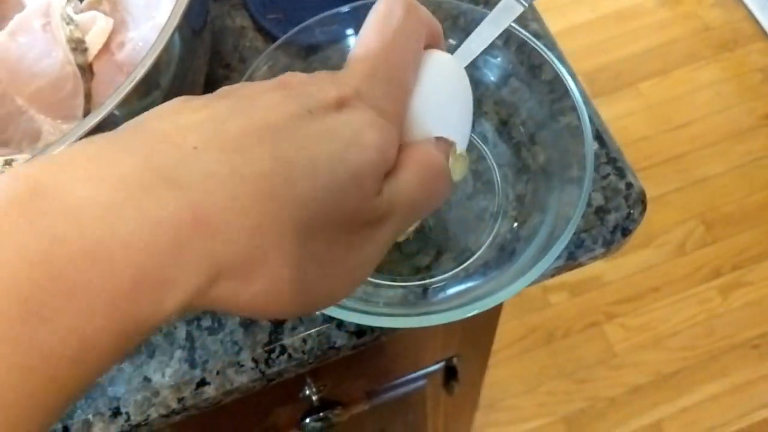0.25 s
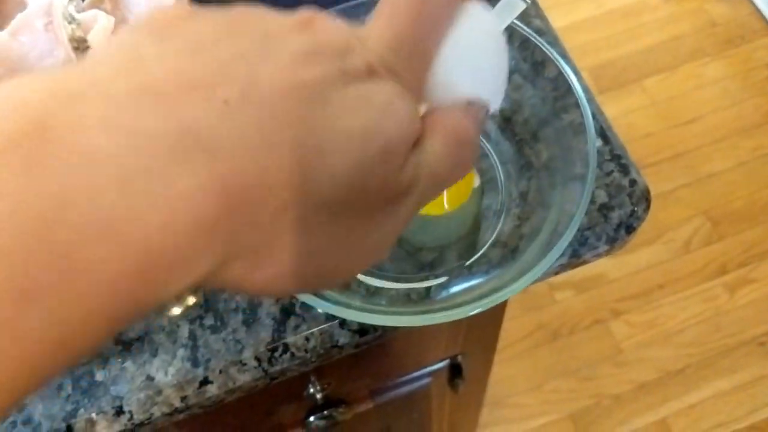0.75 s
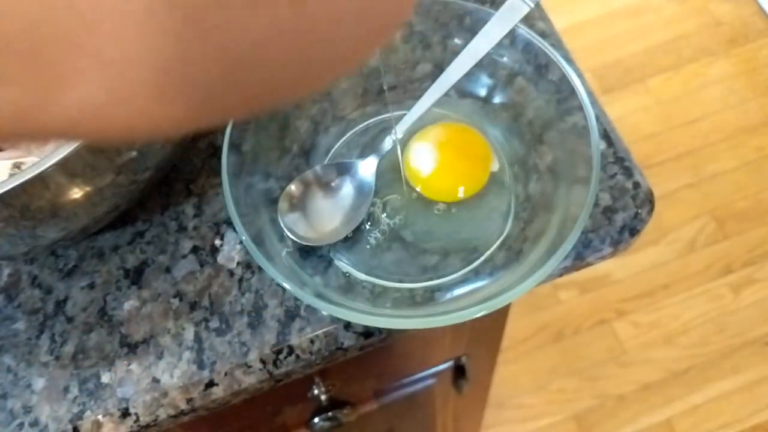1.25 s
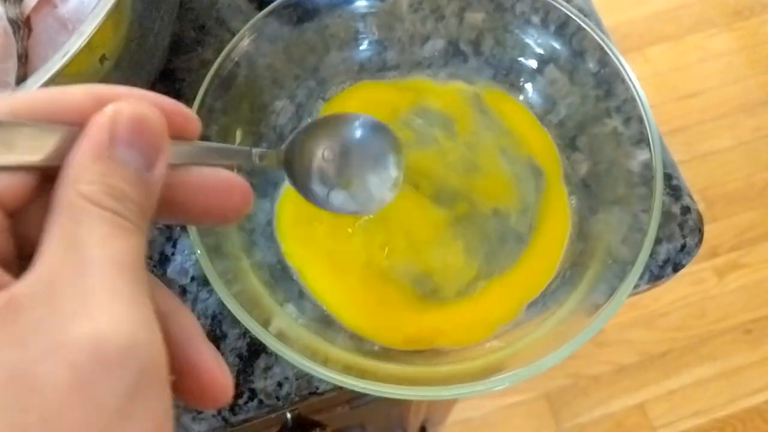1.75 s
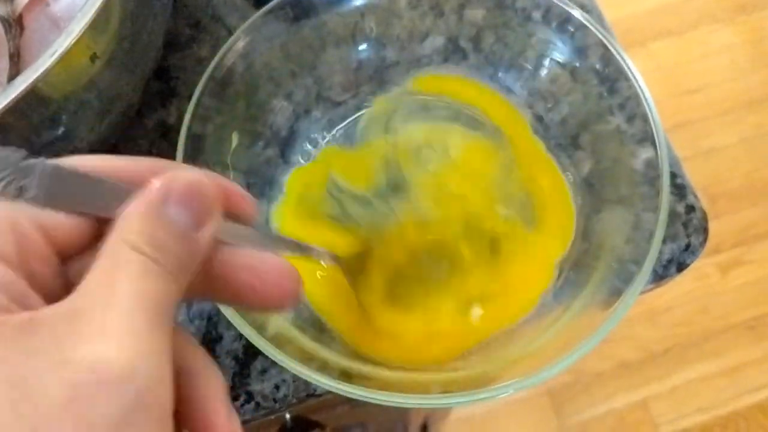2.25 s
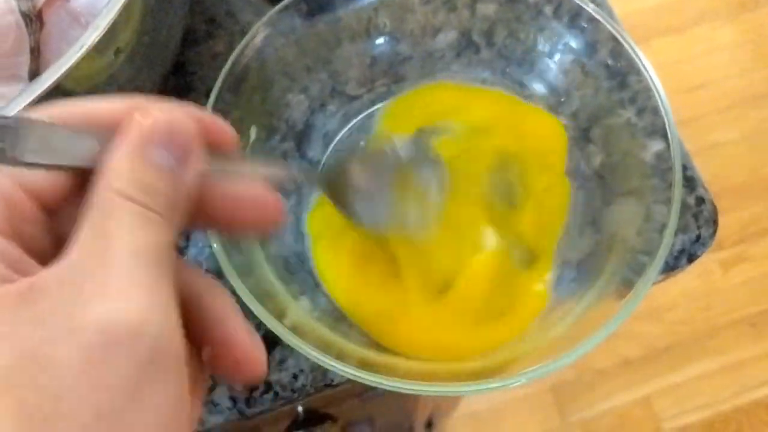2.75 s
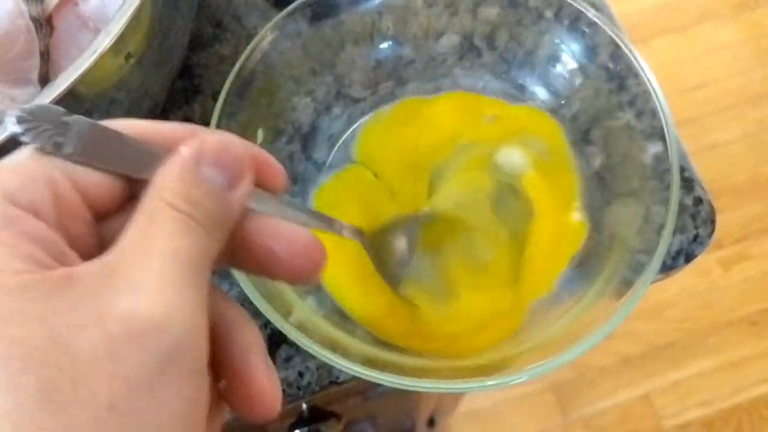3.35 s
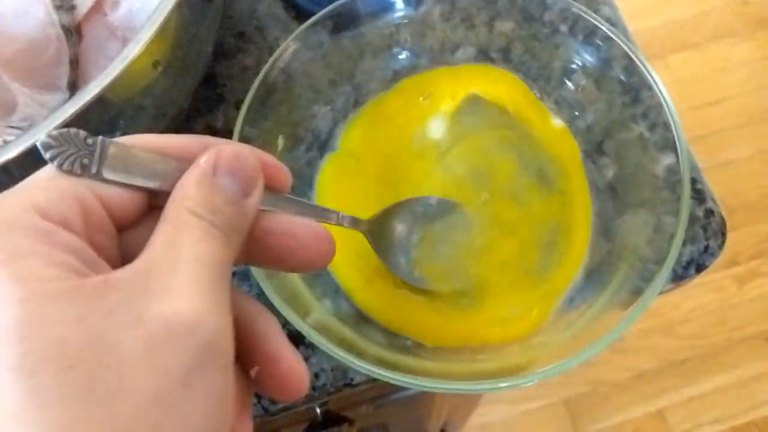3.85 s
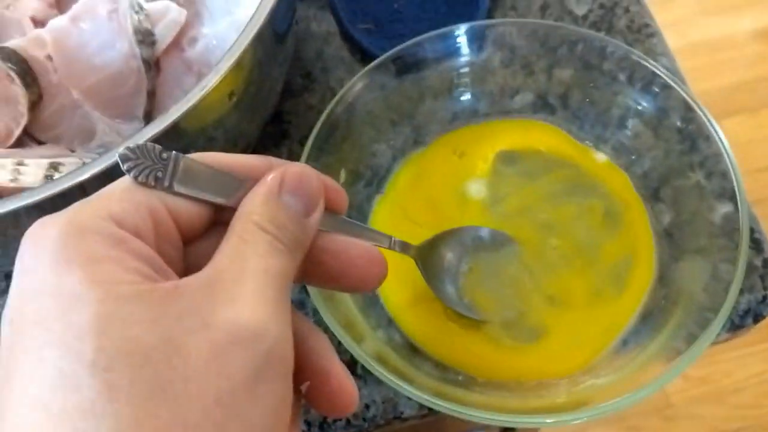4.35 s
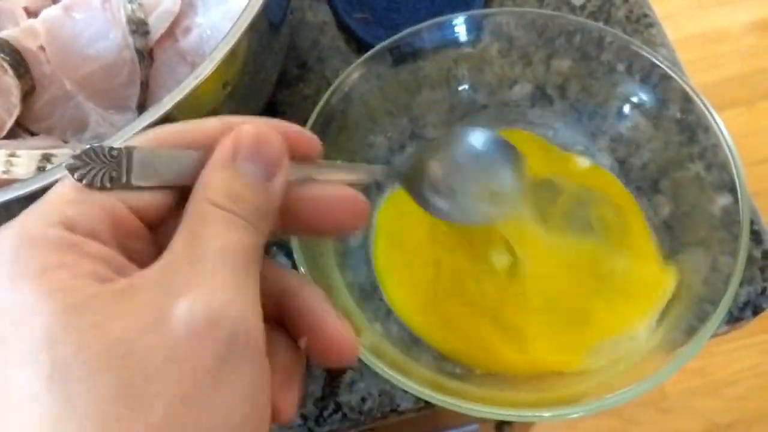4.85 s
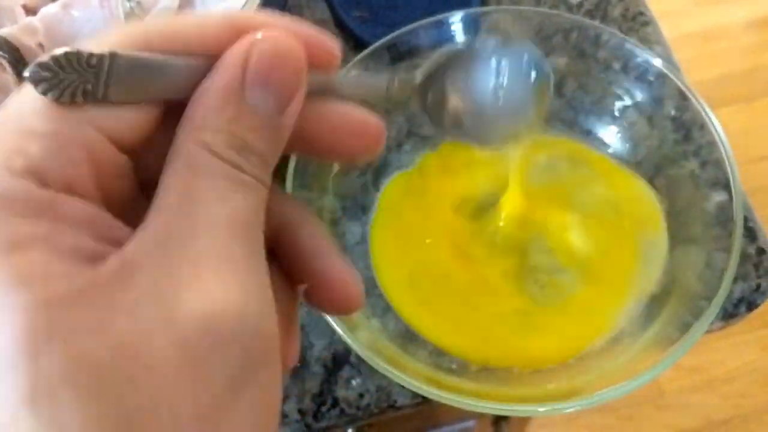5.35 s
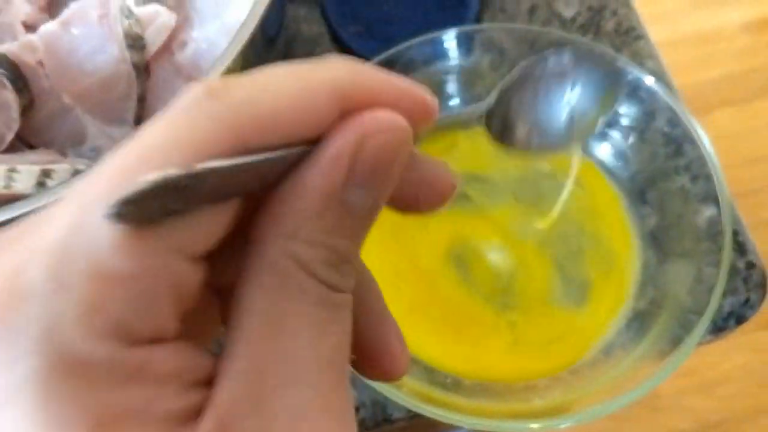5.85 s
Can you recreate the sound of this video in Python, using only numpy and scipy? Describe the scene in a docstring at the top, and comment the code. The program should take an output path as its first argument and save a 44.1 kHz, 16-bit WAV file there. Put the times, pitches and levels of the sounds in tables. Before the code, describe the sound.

A close microphone in a small kitchen, with a quiet, slightly wavering low appliance hum, fan rumble and faint hiss throughout. At the very start come tiny brittle ticks, then from 0.14 to 0.22 seconds a dense cluster of sharp eggshell snaps over fine crumbling. Around 0.56 to 0.64 a weaker, more hollow crackle follows as the shell is pulled apart, with barely audible ticks until about 1.25. A very faint spoon touch at 1.56 leads into light clinks from 1.74, then brighter, stronger steel-on-glass strokes from 2.3 to 3.35, roughly five a second, loudest near 3.1. Each is short and egg-damped, with an edgy click, a dull knock and a short room tail. A sharp tiny tick falls at 3.53 and a softer one at 3.7; low wet pops come near 4.3. Three spaced clinks at 4.74, 5.02 and 5.24, the last softer, leave only the hum until about 6.

```python
"""In a small kitchen an eggshell is cracked and pulled apart over a glass bowl, as brittle snaps over crumbling noise.
A steel spoon then beats the egg about five times a second, with a pause before the last three strokes:
damped bowl and spoon modes, a noisy edge crack, a dull knock and a counter boom.
A few taps and wet pops are damped tones. The room answers shell, spoon and pops with short diffuse tails,
and an appliance motor hums underneath on wavering sine lines over fan rumble and hiss."""
import sys
import numpy as np
from scipy import signal
from scipy.fft import rfft, irfft, next_fast_len
from scipy.io import wavfile
from scipy.ndimage import map_coordinates

SR = 44100
rng = np.random.default_rng(int(sys.argv[2]) if len(sys.argv) > 2 else 0)


def bounce(signal):
    """Save signal as a 16-bit WAV file at the path given by the first command-line argument."""
    frames = np.transpose(np.atleast_2d(signal))
    limited = np.clip(frames, -1, 1)
    pcm = np.round(limited * 32767).astype(np.int16)
    wavfile.write(sys.argv[1], SR, pcm)


N = 268569  # length [samples]

# Spoon strokes on the bowl: t/s, stroke level/dB; then, relative to that stroke: upper rim level/dB,
# spoon level/dB, highest modes level/dB, edge crack level/dB; then first rim f/Hz, second rim f/Hz, spoon f/Hz
SPOON_STROKES = [(1.56, -42, 2, 4, -5, 9, 1303, 4020, 4750),
                 (1.7418, -32.5, 8, 10, -2.5, 8, 1640, 3910, 4620),
                 (1.9027, -31, 11, 9, 3, -3, 1660, 3762, 4800),
                 (1.959, -29.5, -0.5, 1.5, -20, -9, 1260, 3654, 4500),
                 (2.3339, -25, 0, -7, 3, 1.5, 1510, 3840, 5260),
                 (2.537, -27.5, -5, -8.5, 3.5, 0.5, 1573, 3980, 4940),
                 (2.6039, -30.5, -7, -8, -15, -0.5, 1375, 3890, 5000),
                 (2.7382, -26, -4, 6.5, -2, -3, 1537, 3960, 4706),
                 (2.9361, -24, -3, 7, -4, 1.5, 1720, 3994, 4760),
                 (3.1308, -21, -4.5, 2, 0, 1, 1590, 3950, 4690),
                 (3.3392, -24, -5, -13, 3, 1.5, 1550, 3900, 4760),
                 (4.7355, -29.5, -3, -8.5, -4, 1, 1588, 3970, 4690),
                 (5.0243, -27, 4.5, -0.5, 4, 0, 1597, 3856, 4600),
                 (5.2375, -34.5, 6, -5.5, 0, -1.5, 1620, 3820, 4550)]
# Balance of the six mode families in an even stroke, low to high: level/dB
FAMILY_BALANCE = [-0.5, -11, -0.03, -3.5, -2.5, .5]
# Steel edge on glass, noise colour: f/Hz, level/dB
CRACK_COLOUR = [(200, -4), (800, -22), (1300, -17), (2200, 5.5), (4500, 1.5), (9000, -4), (10500, -9),
                (13000, -15), (16000, -28.5)]
# The bowl's base on the counter, noise colour: f/Hz, level/dB
KNOCK_COLOUR = [(100, -13), (200, 8.5), (330, -7), (500, -1.5), (750, -2), (1000, 5), (1300, -1.5),
                (2000, -28.5), (4000, -60)]
# Counter top and cupboard, noise colour: f/Hz, level/dB
BOOM_COLOUR = [(90, -27.5), (150, -11.5), (205, 10.5), (240, -12.5), (320, -9.5), (420, -14.5),
               (700, -36.5)]
# A deep stroke pulls the first rim mode under this pitch and knocks harder
FREE_RIM_HZ, KNOCK_DB_PER_OCTAVE = 1497, 66


def clinks(ring_db=-4.0, ring_length=1.16, crack_db=0, crack_t60=0.013, rise=0.00032,
           knock_db=-25, knock_t60=0.045, boom_db=-30, boom_t60=0.46, lag=0.00065):
    """Where the spoon lands shares the blow between rim and spoon; hard contact adds highest modes and a crack."""
    out = np.zeros(N)
    t = np.arange(SR // 4) / SR
    for s, db, rim_db, spoon_db, hard_db, edge_db, *main_hz in SPOON_STROKES:
        family_db = db + np.add(FAMILY_BALANCE, [0, spoon_db, rim_db, spoon_db, rim_db, hard_db])
        ring = amp(ring_db) * bowl_ring(family_db, main_hz, ring_length, t)
        add(out, s + lag, in_kitchen(ring, wet_db=-15.0, near_db=-17.0))
        # the spoon's edge chatters on the glass, and the bowl knocks dully on the counter
        crack = amp(db + crack_db + edge_db) * burst(CRACK_COLOUR, crack_t60, t)
        depth_octaves = max(np.log2(FREE_RIM_HZ / main_hz[0]), 0)
        knock_level = db + knock_db + KNOCK_DB_PER_OCTAVE * depth_octaves
        knock = amp(knock_level) * burst(KNOCK_COLOUR, knock_t60, t)
        contact = (crack + knock) * (1 - np.exp(-t / rise))
        add(out, s + lag, in_kitchen(contact, wet_db=-11.5, near_db=-7.0))
        # the lowest modes shake the counter, which answers with a faint boom
        boom = amp(db + boom_db) * burst(BOOM_COLOUR, boom_t60, t)
        add(out, s, boom * (1 - np.exp(-t / .006)))
    return out


# Bowl and spoon damped by egg and hand, the four main modes first:
# nominal f/Hz, level within its family/dB, t60/s before the ring length factor
BOWL_MODES = [(1590, 2.5, 0.016), (3920, -1, .02), (4760, 4, 0.01), (6520, 0, 0.014), (1220, -15, 0.0251),
              (1452, -12, 0.031), (1681, -9, 0.031), (1983, -21, 0.014), (2060, -4, 0.014),
              (2366, -1.5, 0.019), (3030, -5.5, 0.007), (3330, -7.5, 0.0067), (3740, -1.5, 0.012),
              (4107, -13.5, 0.0055), (4500, -20, 0.015), (5150, -2.5, 0.0086), (5575, -10.5, 0.023),
              (6070, 0, 0.0085), (6886, 2, 0.0089), (7190, -4.5, 0.0079), (8145, 5, 0.0071),
              (8460, -5, 0.0066), (9110, 3.5, 0.006), (9385, -10, 0.0067), (11120, -13, .005),
              (11140, -13, 0.011), (12740, -16, 0.0064)]
# Borders between the six mode families: f/Hz
FAMILY_BORDERS = [2000, 3200, 4300, 5900, 6900]


def bowl_ring(family_db, main_hz, length, t, build_cycles=1.75, detune=0.0094,
              after_db=-31, after_t60=0.124, top_follow=.14):
    """Mode families each at its own level; the egg stops them within a few hundredths of a second."""
    mode_hz, mode_db, t60 = np.transpose(BOWL_MODES)
    family = np.digitize(mode_hz, FAMILY_BORDERS)
    hz = mode_hz * (1 + detune * rng.standard_normal(len(mode_hz)))
    hz[:len(main_hz)] = main_hz  # the pressing spoon and the moving egg shift the main modes
    hz[3] = mode_hz[3] * (main_hz[0] / mode_hz[0]) ** top_follow  # the top rim mode leans with the first
    cycles = hz[:, None] * t
    decay = amp(-60 * t / (length * t60[:, None]))
    decay[1:4] += amp(after_db - 60 * t / after_t60)  # the upper main modes sing on faintly
    build = 1 - np.exp(-cycles / build_cycles)  # the wave needs a cycle or two to run round the rim
    tones = np.sin(2 * np.pi * (cycles + rng.random((len(hz), 1))))
    modes = amp(mode_db[:, None]) * decay * build * tones
    return sum(amp(db) * unit_attack(modes[family == k].sum(axis=0)) for k, db in enumerate(family_db))


# Loudest snaps of the shell, then its last ticks as it is lifted away: t/s, level/dB before the snap trim
SHELL_SNAPS = [(.0024, -45), (0.011, -37), (0.1403, -32.5), (0.1484, -26), (.1775, -39), (0.186, -34),
               (0.1878, -26.5), (0.2046, -25), (0.2136, -22), (0.5615, -33), (.584, -38.5), (.596, -47),
               (0.615, -36.5), (.637, -45), (0.7913, -53), (0.893, -49.5), (1.2392, -50.5)]
# Snapping shell, noise colour: f/Hz, level/dB
SNAP_COLOUR = [(400, -32), (900, -7), (1300, -22), (1900, -2.5), (2500, -16), (3300, -3.5), (4200, -1),
               (5200, -2.5), (5900, 1), (6700, -11), (8700, 7), (10200, -15), (15000, -36)]
# Crumbling shell, noise colour: f/Hz, level/dB
CRUMBLE_COLOUR = [(400, -31), (1000, -4), (1900, -5), (2600, -8), (3600, 0), (4400, 6.5), (5400, -13),
                  (7000, 1), (8900, 3.5), (10200, -14), (15000, -33.5)]
# Hollow halves, noise colour: f/Hz, level/dB
HOLLOW_COLOUR = [(400, -32), (950, -14), (1270, 3), (1600, 6), (1900, 1), (2600, -15), (5000, -50)]
OPEN_S, CLOSED_DB = .5, -30  # time to pull the halves apart; hollow note's offset while still closed


def eggshell(snap_db=-7, snap_length=0.0016, crumble_db=-2.0, clump_db=10.5, hollow_db=-6.0, lag=.0006):
    """Brittle snaps that stop within a few milliseconds, over clumps of fine crumbling."""
    snaps = np.zeros(N)
    t = np.arange(SR // 30) / SR
    time = np.arange(N) / SR
    listed = [(s, amp(db)) for s, db in SHELL_SNAPS]
    for s, gain in listed + chips():
        add(snaps, s + lag, gain * amp(snap_db) * np.exp(-(t / snap_length) ** 2))
    clumps = unit(amp(clump_db * wobble(500)))
    crumble = amp(crumble_db) * pressure(time) * clumps
    # as the shell opens, its hollow halves add a lower note
    closed = np.clip(1 - time / OPEN_S, 0, 1)
    hollow = amp(hollow_db + CLOSED_DB * closed) * noise(HOLLOW_COLOUR)
    shell = snaps * noise(SNAP_COLOUR) + crumble * noise(CRUMBLE_COLOUR) + (snaps + crumble) * hollow
    return in_kitchen(shell, wet_db=-12.0, near_db=-7)[:N]


# Squeezes of the thumbs on the shell: t/s of the hardest push, crumbling level/dB before the crumble trim
THUMB_SQUEEZES = [(.004, -67), (0.202, -42.5), (0.621, -55.5)]
PRESS_DB_PER_S, RELEASE_DB_PER_S = 269, 242  # how fast a squeeze builds and lets go


def pressure(time):
    """Strength of the crumbling: each squeeze builds to its hardest push and lets go."""
    return sum(amp(db - np.maximum(PRESS_DB_PER_S * (s - time), RELEASE_DB_PER_S * (time - s)))
               for s, db in THUMB_SQUEEZES)


CHIPS_PER_S, CHIP_DB = 73, 5  # rate of small snaps; their mean offset from the squeeze before the snap trim


def chips(spread_db=6, size=200):
    """Unevenly spaced small snaps that follow the strength of the squeeze: (s, gain)."""
    draws = rng.random((size, 2))
    times = (np.arange(size) + draws[:, 0]) / CHIPS_PER_S
    offset_db = CHIP_DB + spread_db * (2 * draws[:, 1] - 1)
    return list(zip(times, pressure(times) * amp(offset_db)))


# Light spoon touches, drips and pops in the egg: t/s, direct peak level/dB, f/Hz, t60/s
TOUCHES_AND_POPS = [(.359, -61, 1040, 0.035), (1.063, -50.5, 3600, 0.0034), (1.083, -55, 3400, .005),
                    (2.041, -43, 1360, 0.025), (2.2554, -44.5, 5550, 0.0019), (2.5196, -36, 3650, 0.0098),
                    (2.723, -47, 4500, 0.0036), (3.5293, -20.5, 6450, 0.00074),
                    (3.7028, -32, 2950, 0.00032), (4.2738, -43.5, 750, .0047), (4.3309, -35.5, 530, .0063)]
TICK_RISE = 0.12  # rise time as a share of t60


def ticks():
    """Each small touch or bursting pocket of air is one damped tone."""
    out = np.zeros(N)
    t = np.arange(SR // 20) / SR
    for s, db, hz, t60 in TOUCHES_AND_POPS:
        rise = 1 - np.exp(-(t / (TICK_RISE * t60)) ** 2)
        tone = np.sin(2 * np.pi * hz * t) * amp(-60 * t / t60) * rise
        add(out, s, amp(db) * tone / np.abs(tone).max())
    return in_kitchen(out, wet_db=-30, near_db=-17)[:N]


# Diffuse tail of the kitchen: f/Hz, t60/s
KITCHEN_DECAY = [(300, 0.54), (1500, 0.41), (4000, 0.37), (7000, 0.37), (10000, 0.22), (15000, 0.24)]


def in_kitchen(x, wet_db, near_db, gap=0.0005, near_t60=0.075):
    """The direct sound, quick returns from counter and hand, and a fresh diffuse tail."""
    hz, t, z = signal.stft(rng.standard_normal(SR // 2), SR, nperseg=256)
    decay = amp(-60 * t / along(KITCHEN_DECAY, hz)[:, None])
    tail = signal.istft(z * decay, SR, nperseg=256)[1]
    t = np.arange(len(tail)) / SR
    arrival = 1 - np.exp(-(t / gap) ** 2)
    tail = tail * arrival
    near = rng.standard_normal(len(t)) * arrival * amp(-60 * t / near_t60)
    response = amp(wet_db) * tail / np.linalg.norm(tail) + amp(near_db) * near / np.linalg.norm(near)
    response[0] = 1  # direct sound
    return signal.fftconvolve(x, response)


# Appliance motor lines: mean f/Hz, rms level/dB before flutter, flutter depth/dB
MOTOR_LINES = [(59.2, -55.8, .25), (118.8, -64.5, 1.3), (210.4, -60, 1.8), (296, -77, 4), (343, -75, 4.5)]
# Fan rumble and faint hiss, noise colour: f/Hz, level/dB
AIR_COLOUR = [(22, -12), (35, -8), (70, 0), (100, .5), (160, -1), (230, -.5), (320, -2.5), (450, -5),
              (700, -11), (1400, -18.5), (2800, -22), (5600, -26.5), (10000, -31), (16000, -34)]


def appliance(air_db=-60.0, drift=0.00169):
    """Motor lines over fan rumble and faint hiss; all share one pitch drift, each flutters in level."""
    t = np.arange(N) / SR
    turned = t + drift * np.cumsum(wobble(6)) / SR
    hum = np.zeros(N)
    for hz, db, flutter_db in MOTOR_LINES:
        level = np.sqrt(2) * amp(db + flutter_db * wobble(10))
        hum += level * np.sin(2 * np.pi * (hz * turned + rng.random()))
    return hum + amp(air_db) * noise(AIR_COLOUR)


def amp(db):
    """Decibels to gain."""
    return 10 ** (np.asarray(db) / 20)


def unit(x):
    """Scale to rms 1."""
    return x / np.sqrt(np.mean(x ** 2) + 1e-20)


def unit_attack(x, size=176):
    """Scale so that the first four milliseconds have rms 1."""
    return x / np.sqrt(np.mean(x[:size] ** 2) + 1e-20)


def along(points, hz):
    """Read (Hz, value) points on a log frequency axis."""
    f, v = np.transpose(points)
    return np.interp(np.log(hz + 1), np.log(f + 1), v)


def filtered(x, response):
    """Shape the spectrum of x with a gain given as a function of frequency."""
    m = next_fast_len(len(x) + SR // 4)
    return irfft(rfft(x, m) * response(np.fft.rfftfreq(m, 1 / SR)), m)[:len(x)]


def coloured(size, spectrum):
    """Noise of rms 1 with the given colour."""
    return unit(filtered(rng.standard_normal(size), lambda hz: amp(along(spectrum, hz))))


def noise(spectrum):
    """Coloured noise as long as the scene."""
    return coloured(N, spectrum)


def burst(spectrum, t60, t):
    """Coloured noise of rms 1 under an exponential decay that starts at full level."""
    return coloured(len(t), spectrum) * amp(-60 * t / t60)


def wobble(rate):
    """A smooth random curve, rate knots a second."""
    knots = rng.standard_normal(int(N * rate / SR) + 4)
    return map_coordinates(knots, [np.arange(N) * rate / SR])


def add(track, s, sound):
    """Mix a sound into the track at s seconds."""
    start = max(round(s * SR), 0)
    part = track[start:start + len(sound)]
    part += sound[:len(part)]


def scene():
    """Spoon, shell and egg over the kitchen's hum."""
    return (clinks() + eggshell() + ticks() + appliance())[None]


TOP_HZ = 16600  # the microphone's band limit


def record(dry):
    """The microphone keeps nothing above its band limit."""
    return np.array([filtered(channel, lambda hz: hz < TOP_HZ) for channel in dry])


dry = scene()
out = record(dry)
bounce(out)
```